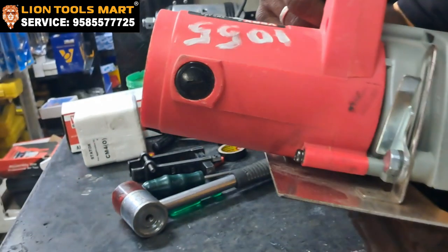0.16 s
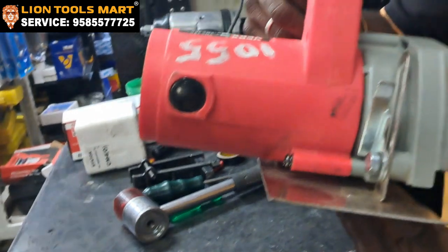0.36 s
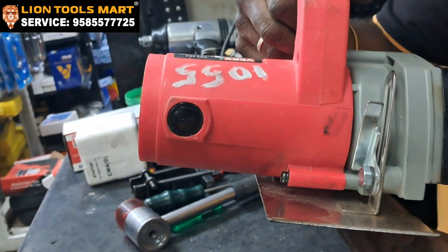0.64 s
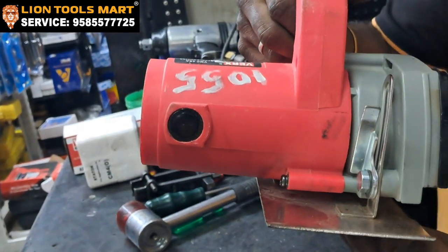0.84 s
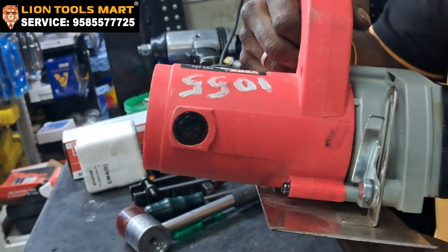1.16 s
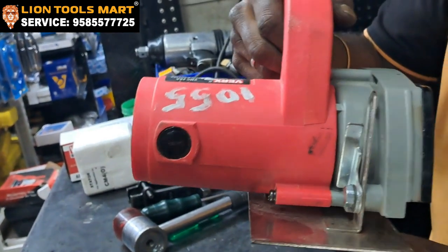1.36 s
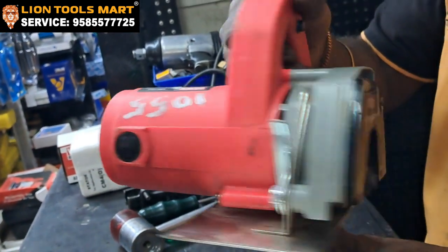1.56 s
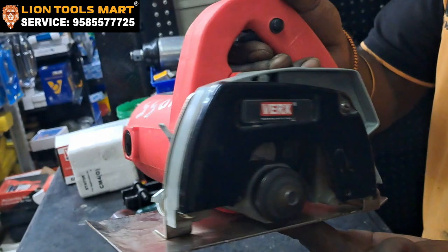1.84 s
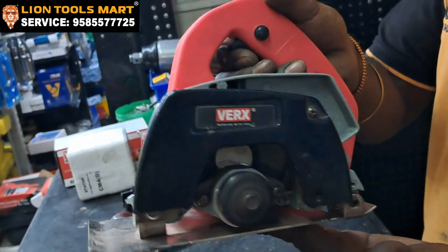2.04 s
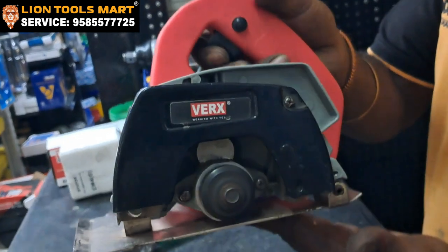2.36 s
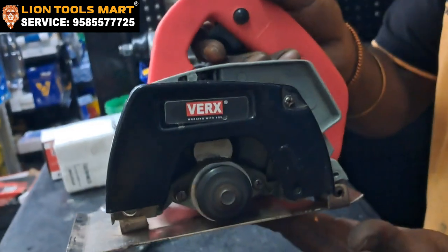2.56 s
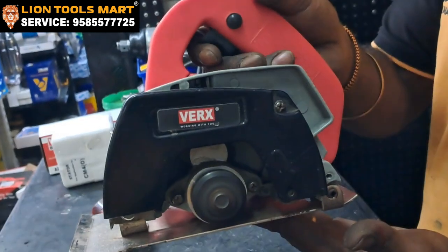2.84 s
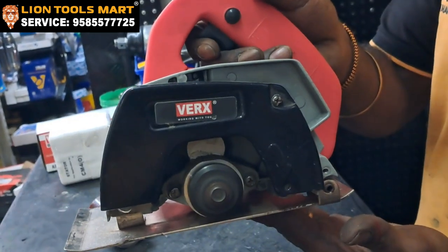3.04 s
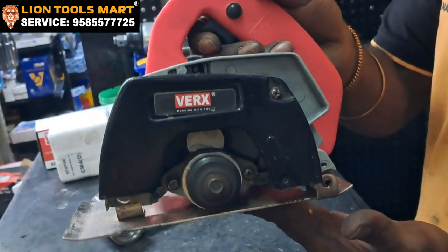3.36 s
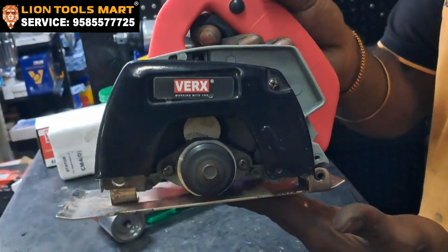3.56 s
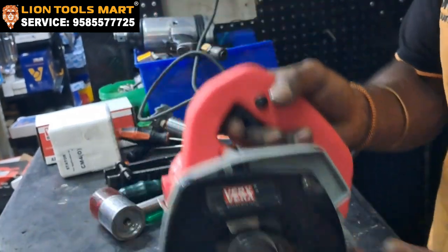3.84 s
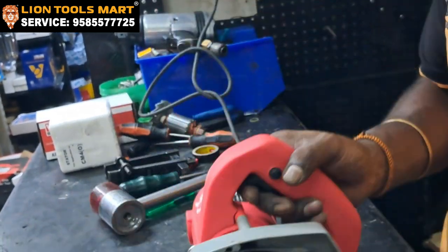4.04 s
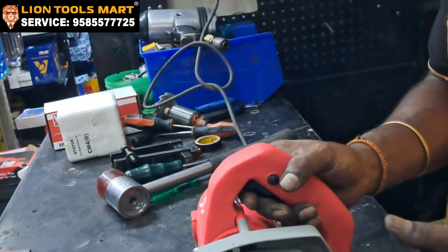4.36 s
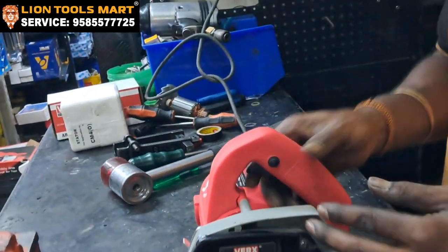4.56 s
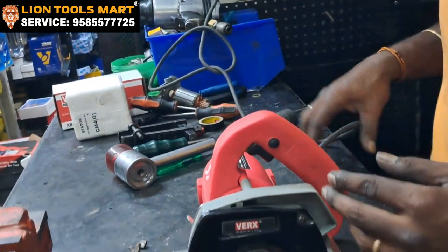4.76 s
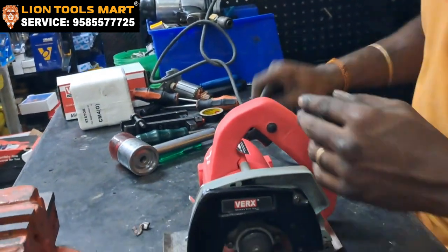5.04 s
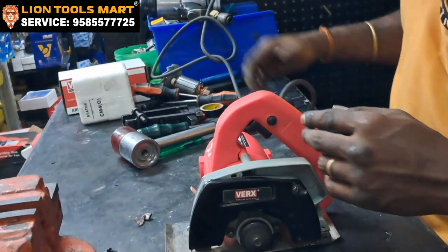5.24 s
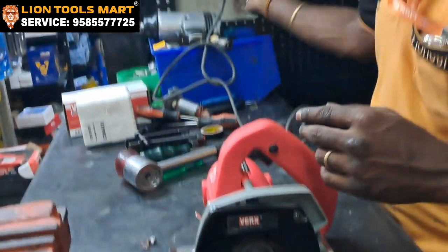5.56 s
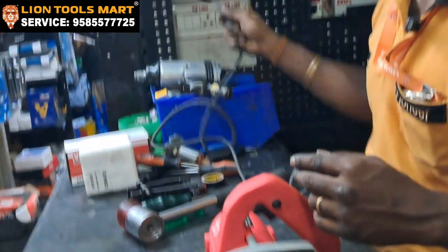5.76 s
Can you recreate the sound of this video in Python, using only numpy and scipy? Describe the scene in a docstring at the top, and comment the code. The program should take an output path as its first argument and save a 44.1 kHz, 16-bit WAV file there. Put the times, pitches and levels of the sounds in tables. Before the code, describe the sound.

A power cutter already spinning whines and roars at full speed, gets knocked, then slowly winds down in a quiet workshop.

```python
"""A hand-held tile cutter, already turning, is heard in a workshop with its fan air and faint room noise.
Three trigger pulls, up to 2.4 s, speed up its whine; narrow bands of noise squeal and air roars.
Knocks on hands and bench, hardest at 1.84 s, are decaying rings; booms are a wavering low tone.
Then it coasts: tones sink in pitch, more knocks come near 4.2 s, and the whine swells near the end.
One microphone signal is spread to two channels by turning its phase zone by zone."""
import sys
import numpy as np
from scipy import signal
from scipy.io import wavfile
from scipy.ndimage import uniform_filter1d

SR = 44100
rng = np.random.default_rng(int(sys.argv[2]) if len(sys.argv) > 2 else 0)


def wrap_up_sound(samples):
    """Save the sound to the file named by the first command line argument, as 16-bit audio."""
    columns = np.atleast_2d(samples).T
    # keep every value between -1 and 1, then stretch to whole-number steps
    tamed = np.clip(columns, -1, 1)
    steps = np.round(tamed * 32767).astype(np.int16)
    wavfile.write(sys.argv[1], SR, steps)


N = 260190


def from_db(db):
    """Turn decibels into a plain multiplier."""
    return 10 ** (np.asarray(db) / 20)


def rms_one(x):
    """Scale a signal to an average (RMS) strength of 1."""
    return x / np.sqrt(np.mean(np.abs(x) ** 2) + 1e-20)


def in_time(rows, s=None):
    """Columns of a table read at every sample, or at times s, with straight lines between rows."""
    at, *columns = np.transpose(rows)
    s = np.arange(N) / SR if s is None else s
    return [np.interp(s, at, column) for column in columns]


def at_hz(points, hz):
    """Read a table of (f/Hz, level/dB) at one frequency."""
    table_hz, table_db = np.array(points).T
    return np.interp(np.log(hz), np.log(table_hz), table_db)


def drift(rate_hz, size=N):
    """Random wandering of spread 1: white noise smoothed twice, so it moves slower at a low rate."""
    r = np.exp(-2 * np.pi * rate_hz / SR)
    run_in = 20000
    white = rng.standard_normal(size + run_in)
    return rms_one(signal.lfilter([1], [1, -2 * r, r * r], white)[run_in:])


def swell(start, level_db, hold, rise, fall):
    """Level in dB that climbs 20 dB in the rise time, holds, and sinks 20 dB in the fall time."""
    s = np.arange(N) / SR - start
    before = -s / max(rise, .005)
    after = (s - hold) / max(fall, .005)
    return level_db - 20 * np.maximum(np.maximum(before, after), 0)


def banded_noise(colour, tilt_db, patchy_db):
    """Third-octave bands of noise, each flickering mostly on its own, tilted above 600 Hz."""
    out, together = 0, drift(8.0)
    edges = 25 * 2 ** np.arange(0, 9.5, 1 / 3)
    white = rng.standard_normal((2, N))
    for k, (low, high) in enumerate(zip(edges, edges[1:])):
        band_filter = signal.butter(2, [low, high], "band", fs=SR, output="sos")
        band = signal.sosfilt(band_filter, white[k % 2])  # neighbours use different noise
        hz = np.sqrt(low * high)
        octaves_up = max(np.log2(hz / 600), 0)
        flicker_db = patchy_db * (0.15 * together + drift(12.0))
        out = out + band * from_db(at_hz(colour, hz) + tilt_db * octaves_up + flicker_db)
    return out * np.sqrt(SR / 2400)  # a flat 0 dB colour has strength 1 within 300-1500 Hz


# when the trigger is held: (press t/s, release t/s)
TRIGGER = [(.12, .903), (1.138, 1.39), (1.596, 2.365)]


def powered():
    """1 while the trigger is held, else 0."""
    s = np.arange(N) / SR
    return sum((s >= press) & (s < release) for press, release in TRIGGER)


START_TURNS, FULL_TURNS = 327, 434.1  # turns per s at the start and flat out
SPIN_UP_S = .338  # time constant
FRICTION, FAN_DRAG = 61.15, 8.95e-4  # loss in turns per s each s: friction + drag x speed squared


def speed():
    """Turns per s: climbs towards full speed under power, else slowed by friction and fan drag."""
    step, turns = 256, [START_TURNS]
    for on in powered()[::step]:
        v = turns[-1]
        gain = (FULL_TURNS - v) / SPIN_UP_S if on else -FRICTION - FAN_DRAG * v * v
        turns.append(v + step / SR * gain)
    return np.interp(np.arange(N) / step, np.arange(len(turns)), turns)


# colour of the faint workshop noise: (f/Hz, level/dB per Hz)
SHOP_COLOUR = [(30, 9), (100, 3), (300, -4.5), (1000, -27), (2200, 6.5), (4000, -6), (7000, -7.5),
               (10000, -43), (15000, -44)]
SHOP_DB = -51.5  # added to every level of the colour


def shop_noise():
    """Faint background noise of the workshop, made of slightly flickering bands."""
    return from_db(SHOP_DB) * banded_noise(SHOP_COLOUR, 0, patchy_db=1.2)


# low booms through hands and bench: (t/s, level/dB, hold/s)
BOOMS = [(.12, -47, .01), (.39, -35, .01), (1.17, -55, 0.074), (1.547, -43, .01), (1.69, -45, .01),
         (1.827, -31, .08), (2.04, -43, .01), (3.394, -41.5, 0.037), (4.081, -26.5, .01),
         (4.161, -22, 0.11), (4.403, -36, .03), (4.57, -46, .1), (4.95, -45, .02), (5.263, -42, 0.082),
         (5.686, -44, 0.081)]
BOOM_HZ, BOOM_WIDTH_HZ = 63, 4  # middle pitch and spread of its wavering
BOOM_REST_DB, BOOM_RISE_S, BOOM_FALL_S = -55.5, .07, 0.092  # rise and fall span 20 dB


def boom():
    """A wavering tone at the lowest resonance of the bench: always faintly there, swelling with each jolt."""
    phase = 2 * np.pi * np.cumsum(BOOM_HZ + BOOM_WIDTH_HZ * drift(8.44)) / SR
    jolts_db = np.max([swell(*row, BOOM_RISE_S, BOOM_FALL_S) for row in BOOMS], axis=0)
    level_db = np.maximum(jolts_db, BOOM_REST_DB + 3.7 * drift(4.0))
    level_db = level_db + 3.0 * drift(18.0)
    return np.sqrt(2) * from_db(level_db) * np.sin(phase)


# soft pushes on the grip: (t/s, push level/dB)
KNOCKS = [(0.372, -34), (.39, -28), (0.41, -31), (0.444, -29), (0.669, -33), (1.812, -21), (1.827, -15),
          (1.839, -6.5), (1.864, -14), (4.068, -26), (4.13, -29), (4.176, -23), (4.258, -21)]
# low ringing modes of the grip: (f/Hz, level/dB relative to the push, time to fall 60 dB/s)
GRIP = [(103, 2.5, 0.077), (194, -9, 0.082), (244, -40, 0.13)]


def knocks():
    """Soft pushes set the low modes of the grip ringing."""
    pushes, out = np.full(N, 1e-18), 0
    for s, push_db in KNOCKS:
        pushes[round(s * SR)] = from_db(push_db)
    for hz, level_db, t60 in GRIP:
        r = from_db(-60 / (t60 * SR))  # shrink per sample
        w = 2 * np.pi * hz / SR
        ring = signal.lfilter([0, np.sin(w)], [1, -2 * r * np.cos(w), r * r], pushes)
        out = out + from_db(level_db) * ring
    return signal.sosfilt(signal.butter(4, 240, fs=SR, output="sos"), out)  # hands are soft


# squeals of the housing, with high overtones from the overloaded microphone:
# (start t/s, length/s, middle f/Hz, width/Hz, level/dB)
SQUEALS = [(0.002, .12, 5900, 490, -34), (.1, .13, 5700, 380, -15), (.15, .24, 6130, 490, -15),
           (.26, .3, 7300, 1080, -24), (.27, .25, 14100, 810, -42), (.32, .32, 5950, 420, -23),
           (.36, .38, 4530, 320, -21), (.45, .66, 15150, 810, -39), (.48, .26, 7350, 1170, -20),
           (.5, .6, 7780, 280, -25), (.51, .3, 3800, 350, -23), (.66, .14, 3700, 500, -28),
           (.53, .1, 10300, 1080, -40), (.6, .2, 490, 80, -36), (.78, .28, 505, 70, -31),
           (.62, .45, 8900, 900, -32), (.69, .44, 7300, 1710, -23), (.7, .36, 4550, 810, -19),
           (.72, .14, 1610, 180, -26), (.75, .25, 10050, 810, -33), (.76, .3, 12700, 1170, -37),
           (.78, .2, 3820, 560, -23), (.99, .14, 3850, 350, -26), (1.14, .2, 7250, 810, -31),
           (1.16, .32, 4620, 320, -24), (1.23, .22, 9350, 560, -37), (1.25, .19, 7800, 420, -31),
           (1.25, .21, 15200, 560, -39), (1.57, .1, 6200, 280, -34), (2.0, .16, 5020, 280, -23),
           (2.25, .22, 5170, 350, -25), (3.4, .42, 4390, 100, -32), (3.42, .2, 1980, 70, -33),
           (3.5, .7, 170, 60, -46), (3.87, .11, 3500, 210, -29), (3.88, .1, 1990, 90, -34),
           (4.04, .14, 3560, 170, -21), (4.11, .22, 6260, 230, -23), (4.2, .12, 1990, 110, -37),
           (4.41, .12, 6170, 350, -37), (4.8, .3, 6220, 200, -48)]
SQUEAL_RISE = 0.46  # share of the length spent rising
SQUEAL_PULL = .4  # share of the rotor's climb that pulls the pitch up under power
SQUEAL_FLICKER_DB = 1.5


def squeals():
    """Narrow bands of noise swell and fade, often several at once, pulled up as the rotor climbs."""
    out = np.zeros(N)
    climb = np.cumsum(np.gradient(np.log(speed())) * powered())
    for start, length, hz, width_hz, level_db in SQUEALS:
        i, size = round(abs(start) * SR), int(np.clip(length, .02, .9) * SR)
        u, pull = np.linspace(0, 1, size), climb[i:i + size]
        shape = np.sin(np.pi / 2 * np.minimum(u / SQUEAL_RISE, (1 - u) / (1 - SQUEAL_RISE)))
        pitch_hz = hz * np.exp(SQUEAL_PULL * (pull - pull.mean()))
        phase = 2 * np.pi * np.cumsum(pitch_hz) / SR
        # two slow noises riding on a cosine and a sine make one narrow band around the pitch
        narrow = signal.butter(2, max(width_hz, 20) / 2, fs=SR, output="sos")
        a, b = rms_one(signal.sosfilt(narrow, rng.standard_normal((2, SR))))[:, SR - size:]
        squeal = a * np.cos(phase) + b * np.sin(phase)
        out[i:i + size] += from_db(level_db + SQUEAL_FLICKER_DB * drift(17.5, size)) * shape * squeal
    return out


# changes in the air beyond the speed law; it dips under loud squeals:
# (t/s, level/dB, brightness/dB per octave)
AIR = [(0, 3, 0), (.135, 2, -1), (.16, -8.5, 0), (.4, -1.5, -0.5), (.7, -3.5, 1.4), (.85, -5, 1.5),
       (.97, -3, 0), (1.1, -3, 1), (1.3, -1, 0.06), (2.1, -1.5, 0), (2.3, 1, 0), (2.7, -0.5, 0),
       (3.1, 0, 0), (3.5, 0.5, 0), (3.95, -2, 1.5), (4.4, 1, 0), (5.25, -1, 0.5), (5.55, -3.5, -1.5),
       (5.9, 0, -1.5)]
# colour of the air: (f/Hz, level/dB per Hz)
AIR_COLOUR = [(60, -16.5), (200, -12), (450, -1.5), (1000, 1.5), (2000, 0), (2700, -0.5), (4500, -2),
              (7000, -9), (9500, -13.5), (13000, -22), (16000, -14)]
# hollows of the housing: (f/Hz, width/Hz, lift/dB)
HOUSING = [(169, 13, 3), (407, 58, 2), (516, 17, 2), (700, 16, 8), (816, 30, 4.5), (972, 18, 4),
           (1160, 23, 2), (1524, 120, 3), (1954, 33, 7.5), (2550, 38, 1.5), (3325, 180, 2.5),
           (4160, 300, 3), (5370, 160, 3), (6500, 840, 0), (7410, 1030, 5.5), (11150, 340, 6)]
# the hiss flares briefly: (t/s, level/dB, brightness/dB per octave)
FLARES = [(.135, 0, 1.2), (4.24, 3, 0.5), (4.47, -0.5, 2), (5.795, -3.5, 3.5)]
FLARE_S = 0.029  # spread of each flare's bell shape
AIR_DB = -29  # at full speed
AIR_LOSS_DB, AIR_DULLING_DB = 6.5, 1.18  # level and brightness per octave lost per halving of speed


def fan_air():
    """Turbulent cooling air, lifted at the hollows of the housing; softer and duller as the fan slows."""
    level_db, tilt_db = in_time(AIR)
    halvings = np.log2(FULL_TURNS / speed())
    level_db = level_db + AIR_DB - AIR_LOSS_DB * halvings
    tilt_db = tilt_db - AIR_DULLING_DB * halvings
    for s, more_db, brighter_db in FLARES:
        shape = np.exp(-.5 * ((np.arange(N) / SR - s) / FLARE_S) ** 2)
        level_db = level_db + more_db * shape
        tilt_db = tilt_db + brighter_db * shape
    air = banded_noise(AIR_COLOUR, tilt_db, patchy_db=1.26)
    for hz, width_hz, lift_db in HOUSING:
        b, a = signal.iirpeak(hz, hz / width_hz, fs=SR)
        air = air + (from_db(lift_db) - 1) * signal.lfilter(b, a, air)
    return from_db(level_db) * air


ONCE, TWICE, SLOT, UPPER, HIGH = 1, 2, 12, 23, 48  # cycles a turn of the rotor's tones
WHINE_WOBBLE = .005  # spread of the uneven running at full speed, as a share of speed
WHINE_FLUTTER_DB, SIDE_FLUTTER_DB, SLOT_GRAIN_DB = 2.5, 3.5, 4.0
# side tones of the upper whine: (turns off it, level/dB relative to it)
SIDE_TONES = [(-2, -27), (-1, -11), (1, -20)]
# resting level of each tone, by name: (level/dB at full speed, loss/dB per halving of speed, power lift/dB)
RESTING = {"once": (-58, 0.67, 0), "twice": (-60.5, 1, 0), "slot": (-41, 11, 1), "upper": (-48, -1, 0),
           "high": (-84, 0, 0)}
# a tone swells as housing and grip take it up:
# (cycles a turn, start t/s, level/dB, hold/s, rise/s, fall/s); rise and fall span 20 dB
SWELLS = [(ONCE, 1.03, -46.5, 0.23, .1, 0.29), (ONCE, 1.94, -41, 0.53, .1, 0.27),
          (TWICE, 2.58, -44.5, 1.23, .3, .25), (SLOT, .36, -26, 0.2, 0.088, .3),
          (SLOT, 0.655, -18, 0.13, 0.17, .2), (SLOT, 0.915, -17, .01, 0.3, 0.26),
          (SLOT, 1.086, -25.5, 0.31, .2, 0.17), (SLOT, 1.64, -31, 0.056, .12, .12),
          (SLOT, 2.057, -18, .02, 0.13, 0.24), (SLOT, 1.92, -28, .45, .06, .1),
          (SLOT, 2.33, -18, .01, 0.15, 0.099), (SLOT, 2.48, -35.5, 0.39, .3, 1),
          (UPPER, 3.05, -45, 0.65, .2, .4), (UPPER, 4.0, -47, 0.3, .3, .3), (UPPER, 4.6, -52, .4, 0.28, .3),
          (UPPER, 5.06, -38, 0.054, 0.33, 0.11), (UPPER, 5.245, -19, .01, 0.043, 0.091),
          (UPPER, 5.355, -14.5, 0.057, 0.064, 0.33), (UPPER, 5.65, -22, 0.036, .2, 0.064),
          (UPPER, 5.89, -38, .02, .1, .1), (HIGH, 4.6, -54, 0.42, .2, .1),
          (HIGH, 5.17, -56.5, .4, 0.11, .3), (HIGH, 5.77, -51, .06, .08, .1),
          (HIGH, 5.88, -34.5, .05, 0.067, .1)]


def rotor():
    """Tones locked to the turning; uneven running adds side tones one or two turns off the upper whine."""
    turns = speed()
    uneven_turns = turns * (1 + WHINE_WOBBLE * turns / FULL_TURNS * drift(76.0))
    angle = 2 * np.pi * np.cumsum(uneven_turns) / SR
    upper = np.sin(UPPER * angle)
    for off, side_db in SIDE_TONES:
        side = np.sin((UPPER + off) * angle + drift(14.0))
        upper += from_db(side_db + SIDE_FLUTTER_DB * drift(14.0)) * side
    slots = from_db(SLOT_GRAIN_DB * drift(120.0)) * np.sin(SLOT * angle)  # brush chatter roughens it
    tones = {"once": (ONCE, np.sin(angle)), "twice": (TWICE, np.sin(TWICE * angle)),
             "slot": (SLOT, slots), "upper": (UPPER, upper), "high": (HIGH, np.sin(HIGH * angle))}
    out, on = 0, uniform_filter1d(1. * powered(), size=2000)
    for name, (cycles, tone) in tones.items():
        full_db, loss_db, power_db = RESTING[name]
        rest_db = full_db - loss_db * np.log2(FULL_TURNS / turns) + power_db * on
        swells_db = [swell(*row[1:]) for row in SWELLS if row[0] == cycles]
        level_db = np.max([rest_db] + swells_db, axis=0)  # the loudest wins
        out = out + from_db(level_db + WHINE_FLUTTER_DB * drift(18.6)) * tone
    return np.sqrt(2) * out


def scene():
    """Add up all the sources, the same on both channels."""
    mono = shop_noise() + boom() + knocks() + squeals() + fan_air() + rotor()
    return np.array([mono, mono])


# stereo zones: (t/s, then the upper edges f/Hz of zones one to six)
EDGES = [(0, 2500, 3530, 6000, 6090, 7920, 9000), (.3, 2510, 3940, 5800, 6065, 7970, 9220),
         (.58, 2580, 3680, 5230, 5700, 8150, 8850), (.75, 2580, 3870, 5280, 5100, 8290, 8550),
         (1.6, 2425, 3230, 5050, 5030, 7950, 9120), (2.0, 2130, 3360, 5100, 5220, 7290, 8800),
         (2.45, 1960, 3340, 5450, 5140, 7080, 8770), (3.1, 1050, 3290, 4900, 4600, 6640, 8840),
         (3.5, 860, 2800, 4730, 4880, 6040, 8950), (4.3, 258, 2580, 4700, 4570, 6090, 8510),
         (5.0, 298, 2840, 4130, 4210, 5630, 7960), (5.6, 222, 3050, 3230, 3300, 4760, 7400),
         (5.9, 200, 3180, 3435, 3350, 4740, 7060)]
# phase by which left leads right, one value [radians] per zone, from low to high
ZONE_TURN = [0, -1.95, 2.45, np.pi, .06, np.pi, 0]
EDGE_WAVER_HZ, ROUND_TOP, CUTOFF_HZ = 40, 2.2, 16300  # edge spread; peak ceiling; top of the sound


def record(dry):
    """Peaks are rounded; each zone is turned apart in phase between the channels; the top is cut."""
    rounded = ROUND_TOP * np.tanh(dry[0] / ROUND_TOP)
    hz, s, frames = signal.stft(rounded, SR, nperseg=1024)
    ragged = EDGE_WAVER_HZ * drift(8.0)[np.minimum(s * SR, N - 1).astype(int)]
    edges = np.maximum.accumulate(in_time(EDGES, s))  # no edge lies below the one before it
    zone = sum(hz[:, None] > edge + ragged for edge in edges)
    turn = np.exp(.5j * np.array(ZONE_TURN)[zone])  # half the turn each way
    pair = np.array([signal.istft(frames * z, SR, nperseg=1024)[1][:N] for z in (turn, turn.conj())])
    return signal.sosfilt(signal.cheby2(14, 70, CUTOFF_HZ, fs=SR, output="sos"), pair)


dry = scene()
out = record(dry)
wrap_up_sound(out)
```